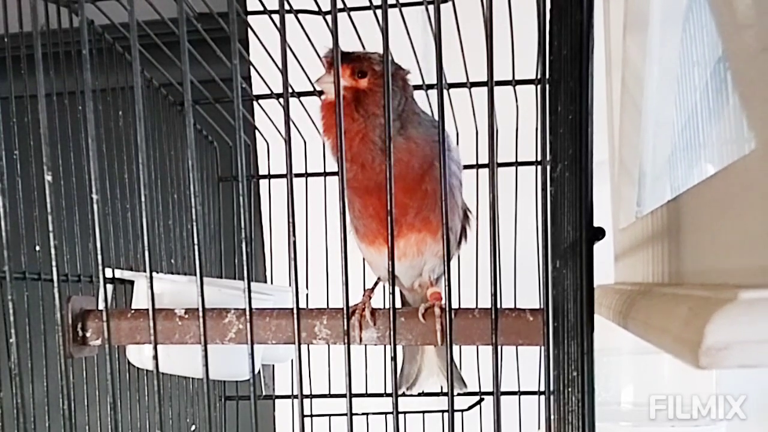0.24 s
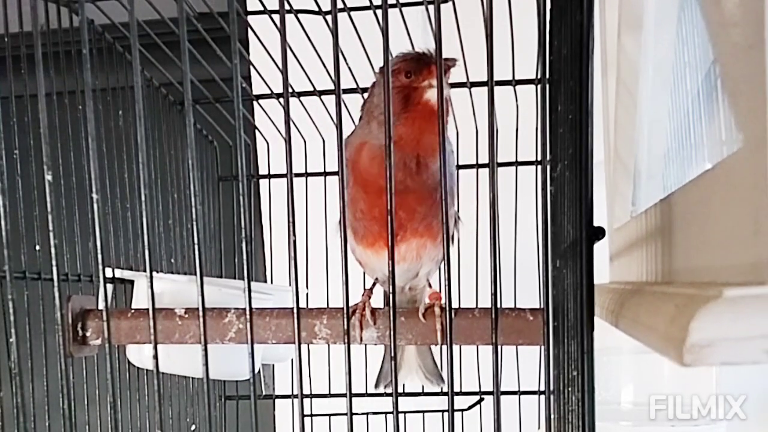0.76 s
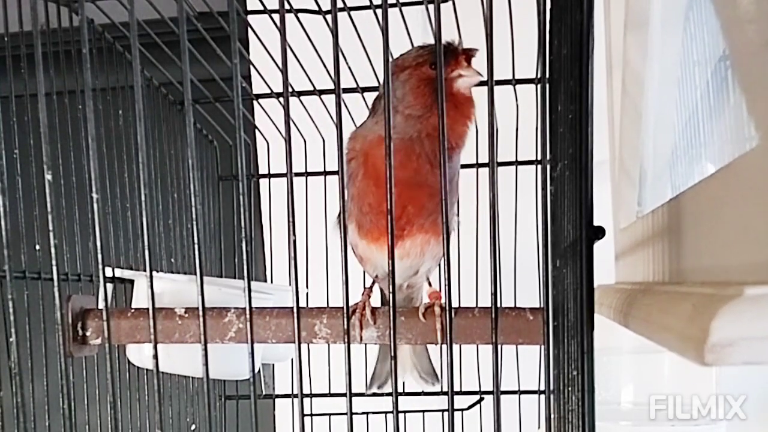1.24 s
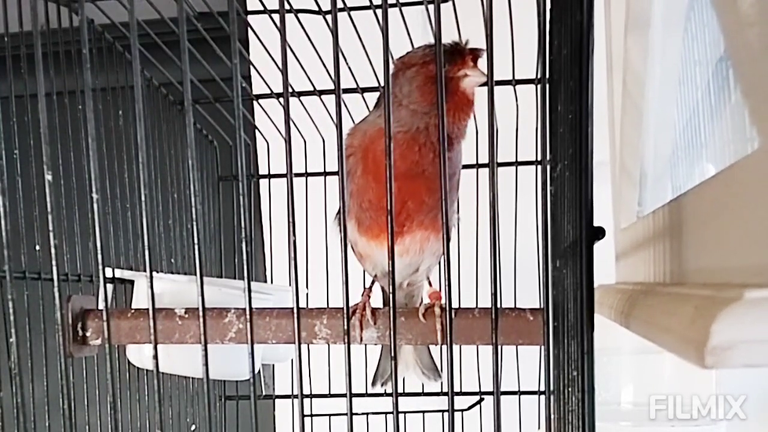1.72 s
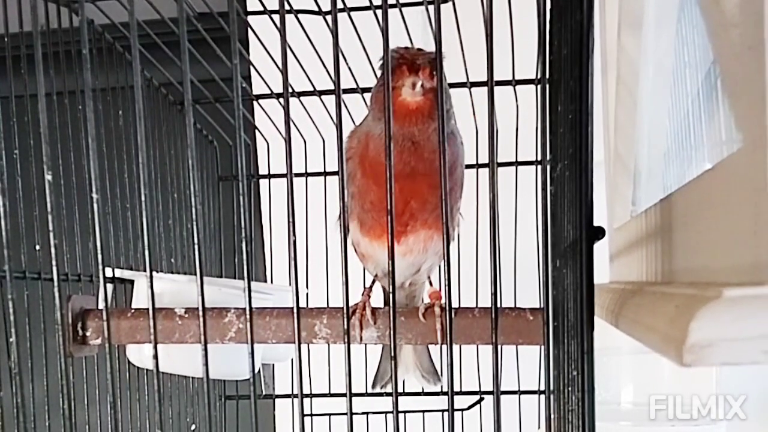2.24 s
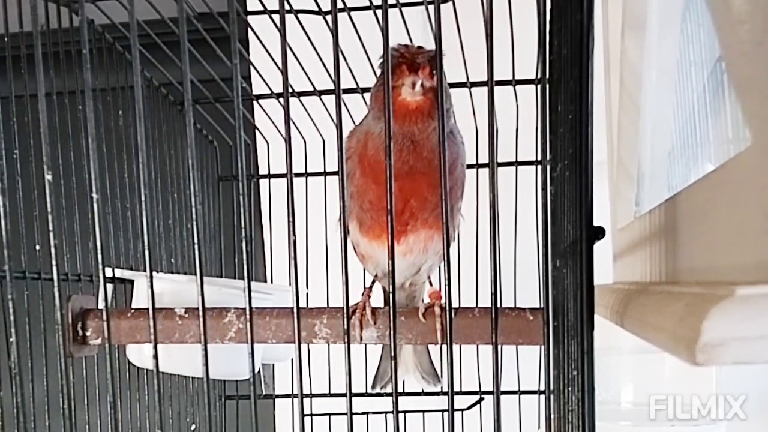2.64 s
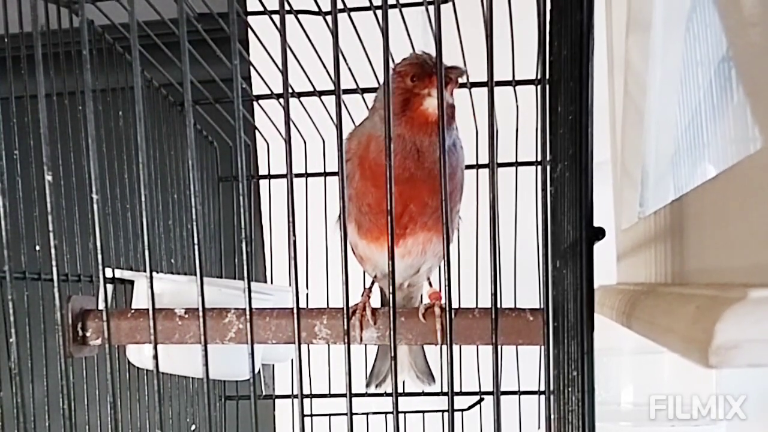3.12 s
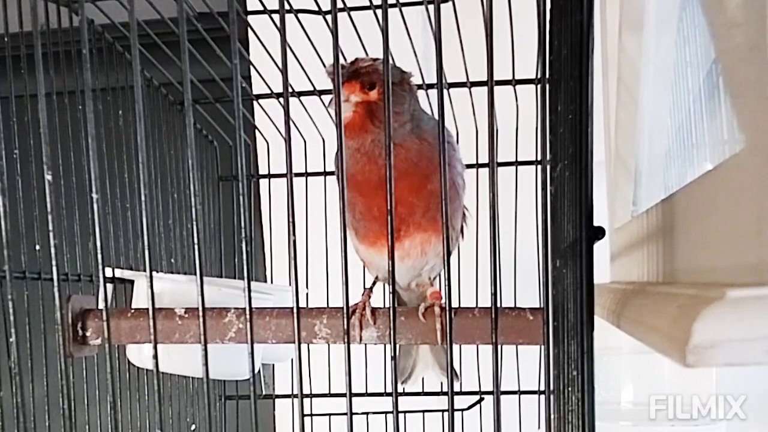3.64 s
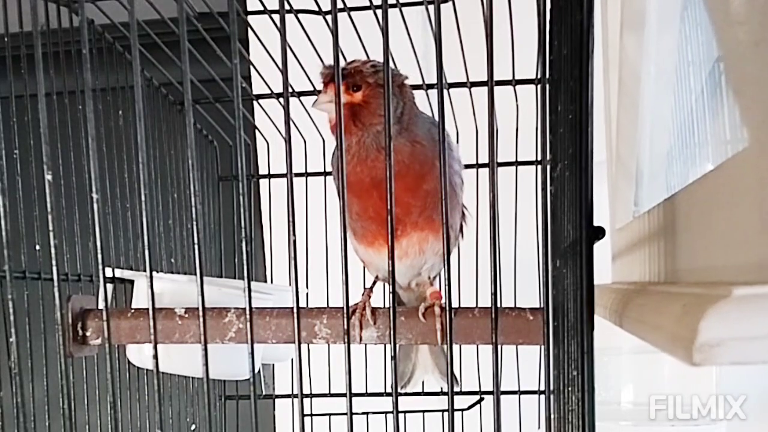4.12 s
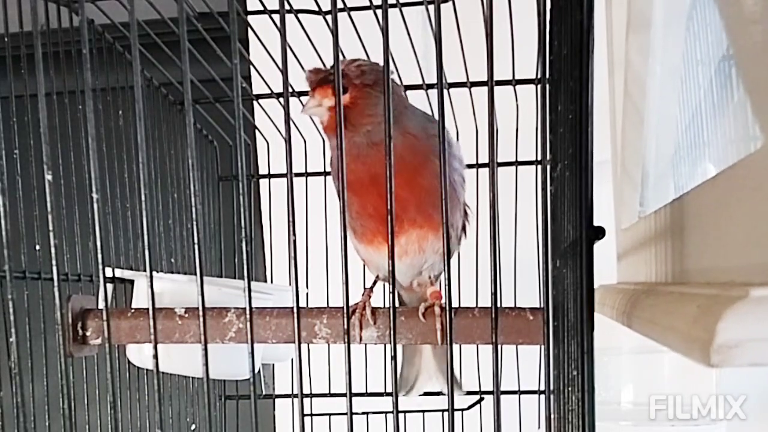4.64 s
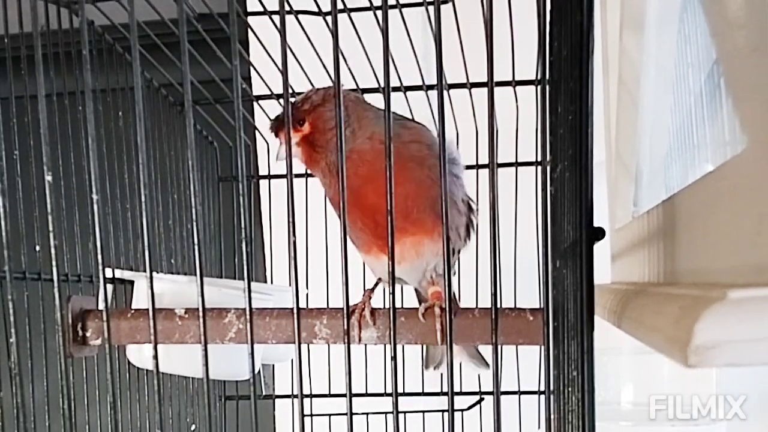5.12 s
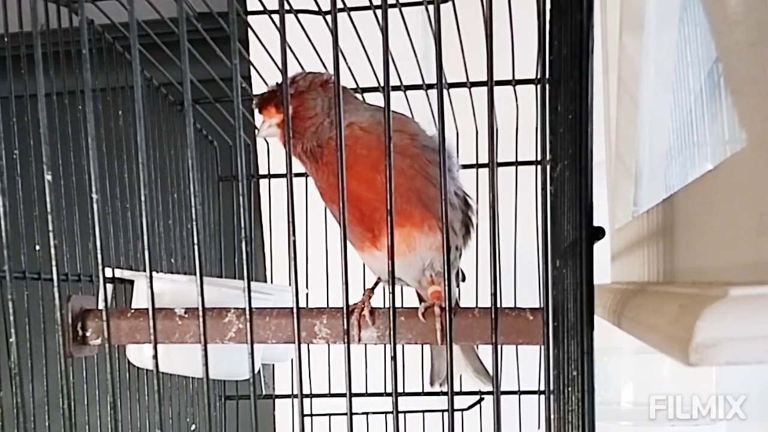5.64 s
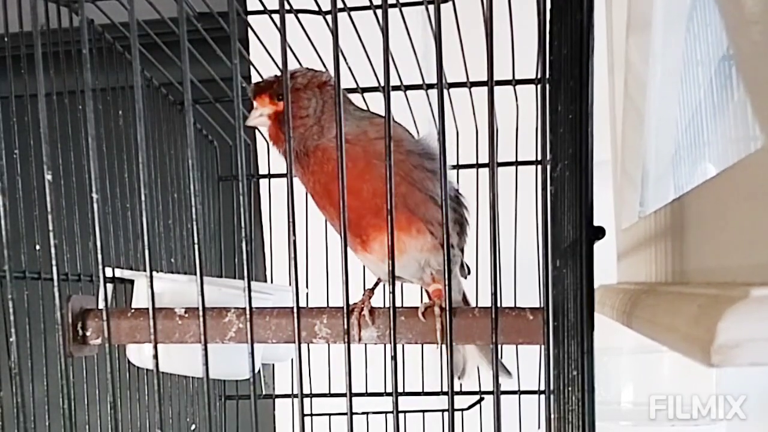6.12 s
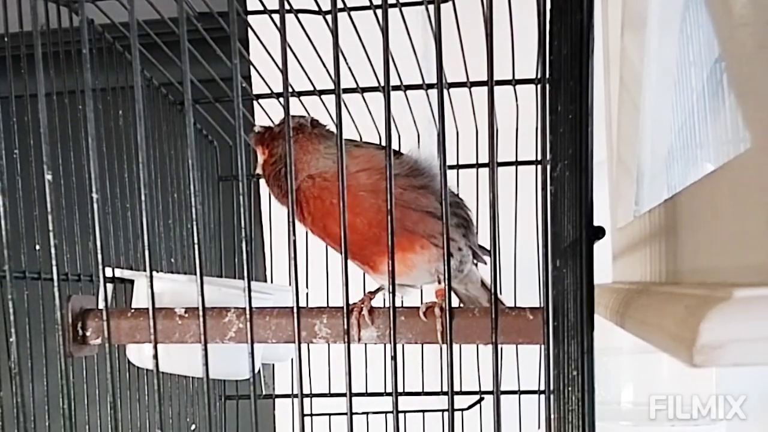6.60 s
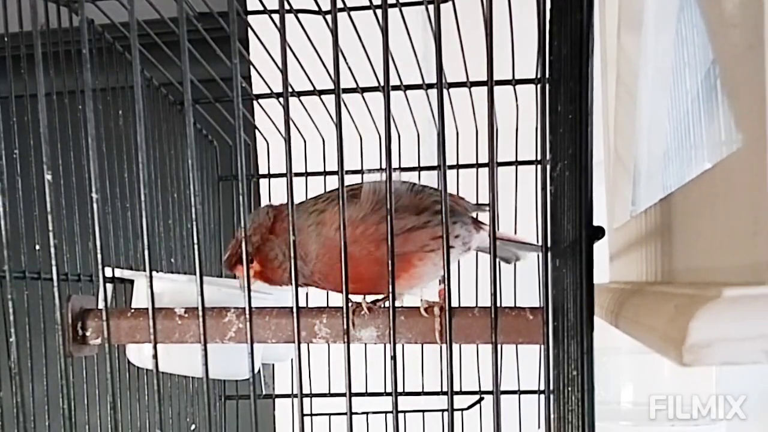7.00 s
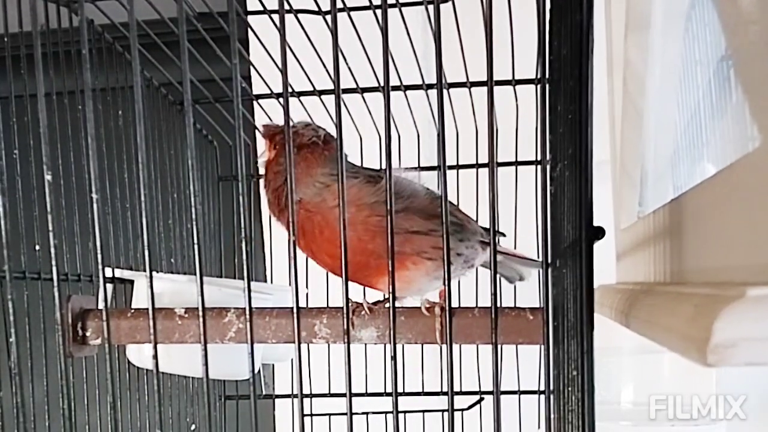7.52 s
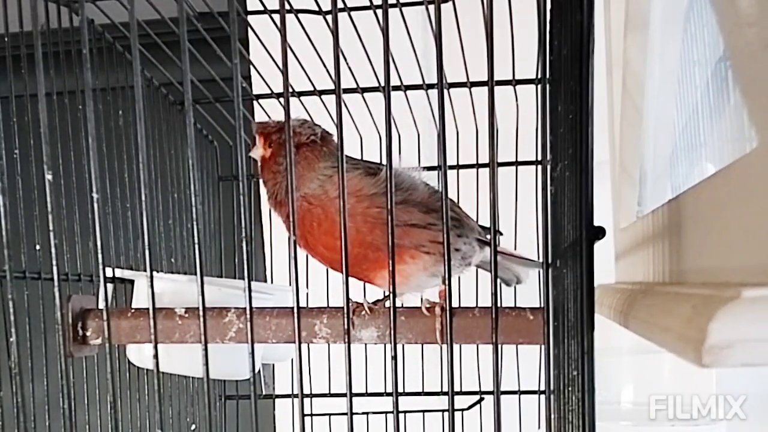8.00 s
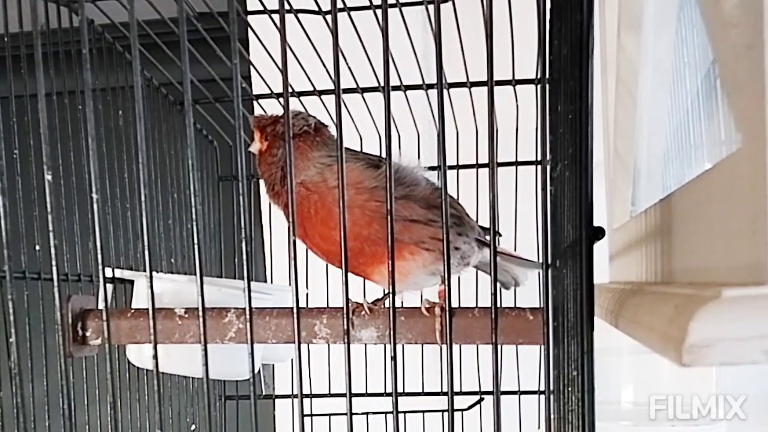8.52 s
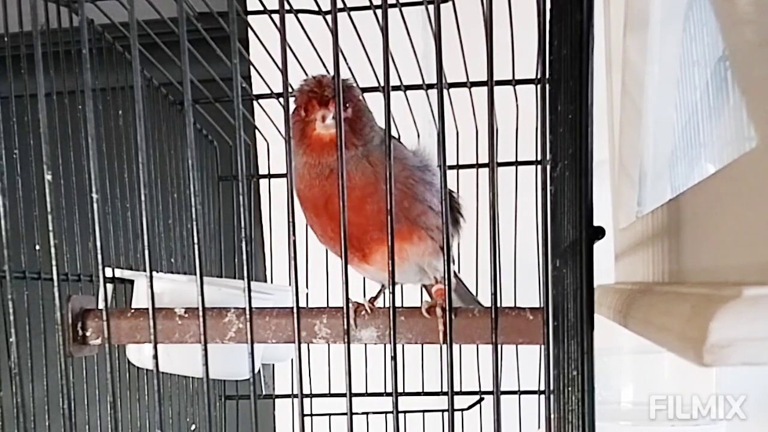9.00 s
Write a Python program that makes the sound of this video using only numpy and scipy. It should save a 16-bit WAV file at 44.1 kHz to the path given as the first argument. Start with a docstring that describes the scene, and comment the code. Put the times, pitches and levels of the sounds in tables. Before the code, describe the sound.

A close canary sings five quick notes, a whistle and a loud falling trill, then distant canaries chirp faintly amid wind rumble and soft cage rattles.

```python
"""A caged canary sings close by in a hard-walled room: pulsed notes, a whistle, then a trill of falling sweeps.
Other canaries chirp, trill and roll further off, as enveloped sine glides washed out by the room.
Late on, the near bird scuffles and rings its cage, noise through resonances, then gives two upward calls.
Gusts of shaped noise rumble on the microphone from the start, thin out past the middle and return at the end."""
import sys
import numpy as np
from scipy import signal
from scipy.fft import rfft, irfft, next_fast_len
from scipy.io import wavfile
from scipy.ndimage import map_coordinates

SR = 44100
rng = np.random.default_rng(int(sys.argv[2]) if len(sys.argv) > 2 else 0)


def materialize(psi):
    """Save the field psi as 16-bit PCM at rate SR to the path in sys.argv[1].

    A 1-D psi becomes a single channel; in a 2-D psi each row is a channel.
    """
    bounded = np.clip(np.atleast_2d(psi).T, -1, 1)
    quanta = np.round(bounded * 32767).astype(np.int16)
    wavfile.write(sys.argv[1], SR, quanta)


N = 408366


def near_canary():
    """Notes and sweeps, heard directly, off the nearest walls and through the room."""
    # echoes off the walls: left delay/s, left level/dB, right delay/s, right level/dB
    walls = [(.00324, -17.5, 0.0047, -11), (.00972, -8, 0.0079, -11), (0.0219, -15.5, .026, -20)]
    notes, trill = near_notes(), near_trill()

    def delayed(hz, s, db):
        return amp(db) * np.exp(-2j * np.pi * hz * s)

    def echoes(hz):
        return sum(np.array([delayed(hz, left_s, left_db), delayed(hz, right_s, right_db)])
                   for left_s, left_db, right_s, right_db in walls)

    def direct(hz):
        # the bird sits to the left, so its sound reaches the right port later and weaker
        return np.array([np.ones_like(hz), delayed(hz, 0.000091, -11.5)])

    def lean(hz):
        # the overtones lean to the right
        right_lean_db = along([(5000, 3.2), (8000, 18.5), (14000, 34.0)], hz)
        return amp(np.outer([-.5, .5], right_lean_db))

    close = filtered(notes + trill, lambda hz: lean(hz) * (direct(hz) + echoes(hz)))
    # the beak beams high notes forward: less of them spills into the room
    spill = filtered(trill + amp(-3) * notes, lambda hz: amp(along([(3200, -10), (4000, -11)], hz)))
    return close + room(spill, t60=0.56, treble_t60=0.6)


def near_notes():
    """The pulsed opening notes and the upward calls, each a syrinx tone on a pitch glide."""
    # opening notes, all gliding up to one pitch: onset t/s, length/s, start f/Hz, level/dB
    pulses = [(.004, 0.046, 2382, -20.5), (0.081, 0.059, 2240, -22), (.167, 0.055, 2358, -21),
              (0.254, 0.052, 2407, -23), (0.349, 0.047, 2426, -21)]
    pulse_to_hz, pulse_rasp = 2495, .15
    pulse_overtone_db, pulse_hiss_db = 1, -22
    # the whistle and the later calls: onset t/s, length/s, start f/Hz, end f/Hz, level/dB,
    # rasp/0-1, overtone boost/dB, hiss/dB
    calls_up = [(0.33, 0.195, 3800, 4025, -23, .06, -9, -42), (7.491, .074, 3330, 3930, -28, .35, -12, -35),
                (8.131, 0.19, 3560, 4015, -29.5, .07, -7, -48)]
    call_bend, call_edge = 4.9, 0.79  # how soon a call reaches its pitch, how gently it swells
    track = np.zeros(N)
    for s, length, start_hz, db in pulses:
        pitch, swell = glide(length, start_hz, pulse_to_hz, bend=2, edge=0.47)
        voice = syrinx(pitch, pulse_rasp, pulse_overtone_db, pulse_hiss_db)
        add(track, s, amp(db) * swell * voice)
    for s, length, start_hz, end_hz, db, rasp, overtone_db, hiss_db in calls_up:
        pitch, swell = glide(length, start_hz, end_hz, call_bend, call_edge)
        voice = syrinx(pitch, rasp, overtone_db, hiss_db)
        add(track, s, amp(db) * swell * voice)
    return track


def near_trill():
    """One falling sweep, repeated; effort sets its level and pitch."""
    # pitch through one sweep: share of its length/0-1, ratio to its top pitch
    fall_pitch = [(0, 1), (.25, .81), (.65, .6), (1, .35)]
    # loudness through one sweep: share of its length/0-1, level/dB
    fall_level = [(0, -10), (0.159, 0), (.36, -8), (.56, -1.5), (.76, -14), (1, -19)]
    # effort through the trill: t/s, level/dB, top of a sweep f/Hz
    effort = [(0.47, -21, 3206), (.56, -18.5, 3505), (.85, -18, 3558), (1.189, -21, 3564),
              (1.391, -23, 3347)]
    first_s, period_s, sweep_s = .471, .0895, .051
    drag_s = .028  # the trill keeps a steady beat, then drags as the bird tires: delay of the last sweep
    track = np.zeros(N)
    times, effort_db, top_hz = np.transpose(effort)
    u = np.linspace(0, 1, int(sweep_s * SR))
    swell = amp(np.interp(u, *np.transpose(fall_level))) * signal.windows.tukey(len(u), .1)
    fall = np.interp(u, *np.transpose(fall_pitch))
    # each sweep starts with a rough catch and strong overtones, then runs more smoothly
    rasp = .13 + .25 * np.exp(-u / .08)
    overtone_db = 13 * np.exp(-u / .13) - 4.5
    for s in beats(first_s, period_s, count=11, drag=drag_s):
        pitch = np.interp(s, times, top_hz) * fall * (1 + 0.03 * wobble(140, len(u)))
        voice = syrinx(pitch, rasp, overtone_db, air_db=-18.5)
        add(track, s, amp(np.interp(s, times, effort_db)) * swell * voice)
    return track


def syrinx(pitch, rasp, overtone_db, air_db):
    """A tone with overtones and a hiss; rasp shakes it and adds a noisy band just above the pitch."""
    # overtones before the boost: multiple of the pitch, level/dB
    overtones = [(2, -21), (3, -28.5), (4, -34.5)]
    size = len(pitch)
    phase = 2 * np.pi * np.cumsum(pitch) / SR + rasp * wobble(1100, size)
    tone = np.sin(phase)
    for k, db in overtones:
        below_nyquist = k * pitch < SR / 2
        tone = tone + amp(db + overtone_db) * np.sin(round(k) * phase) * below_nyquist
    shaken = tone * (1 + rasp * wobble(700, size))
    skirt = rasp * wobble(1300, size) * np.sin(1.17 * phase)
    hiss = amp(air_db) * rng.standard_normal(size)
    return np.sqrt(2) * (shaken + skirt) + hiss


def glide(length, start_hz, end_hz, bend, edge):
    """Pitch and loudness of a syllable: positive bend moves fastest at first, negative bend at last."""
    u = np.linspace(0, 1, int(length * SR))
    pitch = start_hz + (end_hz - start_hz) * np.expm1(-bend * u) / np.expm1(-bend)
    return pitch, np.abs(np.sin(np.pi * u)) ** edge


def beats(first, period, count, drag):
    """Times of a steady beat whose last strokes come up to drag seconds late."""
    drag_power = 6.5  # how late the drag sets in
    return first + period * np.arange(count) + drag * np.linspace(0, 1, count) ** drag_power


def far_canaries():
    """Each phrase repeats one sine syllable, a little different every time, washed out by the room."""
    # trills of falling chirps: first t/s, last t/s, period/s, length/s, start f/Hz, end f/Hz, level/dB
    falling = [(1.699, 2.074, .124, 0.045, 5400, 3320, -56), (2.195, 2.322, .125, .05, 5240, 3404, -53),
               (1.776, 2.401, .125, 0.022, 7360, 6280, -69), (7.735, 8.125, .1, 0.069, 4740, 3260, -60),
               (8.32, 8.626, .1, 0.045, 5210, 3970, -60), (8.731, 8.953, .22, .085, 5020, 2910, -50)]
    # trills of rising chirps: first t/s, last t/s, period/s, start f/Hz, level/dB
    rising = [(2.516, 3.174, .058, 5420, -63), (2.598, 3.242, 0.063, 4350, -65.5),
              (3.231, 3.579, .0865, 5580, -53.5), (4.038, 4.33, .097, 5270, -62)]
    # trills of hooked notes: first t/s, last t/s, period/s, lowest f/Hz, level/dB
    hooked = [(3.313, 3.849, .0894, 4420, -52), (3.939, 4.611, .096, 4290, -51)]
    # rolls of fast falling notes: first t/s, last t/s, top f/Hz, bottom f/Hz, level/dB
    rolls = [(2.099, 2.56, 3700, 3310, -70), (2.599, 3.22, 3676, 3230, -62.5),
             (4.72, 5.16, 3395, 3077, -48.5), (5.2, 5.58, 3213, 2930, -62), (5.62, 6.0, 2840, 2115, -68),
             (6.04, 6.62, 3000, 2140, -64), (8.28, 8.49, 3244, 2980, -56.5), (8.56, 8.68, 3445, 3190, -55)]
    # single whistles: onset t/s, length/s, start f/Hz, end f/Hz, level/dB
    whistles = [(2.464, 0.037, 5070, 4390, -58.5), (4.702, 0.036, 2785, 2770, -48.5),
                (6.674, 0.053, 3040, 4020, -55), (6.912, 0.081, 3940, 4186, -57),
                (7.232, 0.163, 4590, 4655, -58), (7.63, 0.035, 4630, 4680, -56)]
    rise_ratio, rise_s, hook_fall_s = 1.19, .019, .02
    roll_period_s, roll_note_s = .038, 0.024
    # a falling chirp thins where one side of the syrinx hands over to the other
    break_hz, break_width_hz, handover_db = 4000, 380, -11
    waver = .01  # random detuning, as a share of the pitch
    arch_db = 3  # a phrase swells toward its middle
    direct_db, far_t60_s = -10, .37
    song = np.zeros(N)

    def sing(times, length, start_hz, end_hz, db, bend, break_db=0):
        pitch, swell = glide(length, start_hz, end_hz, bend, edge=0.2)
        swell = swell * amp(break_db * np.exp(-((pitch - break_hz) / break_width_hz) ** 2))
        arch = np.sin(np.pi * (np.arange(len(times)) + .5) / len(times)) - 1
        for s, note_db in zip(times, db + arch_db * arch):
            drift = waver * (rng.standard_normal() + wobble(392, len(pitch)))
            tone = np.sin(2 * np.pi * np.cumsum(pitch * (1 + drift)) / SR)
            add(song, s, amp(note_db + rng.standard_normal()) * swell * tone)

    for first, last, period, length, start_hz, end_hz, db in falling:
        sing(repeats(first, last, period), length, start_hz, end_hz, db, bend=0.22, break_db=handover_db)
    for first, last, period, hz, db in rising:
        sing(repeats(first, last, period), rise_s, hz, rise_ratio * hz, db, bend=1)
    # a hooked note flicks up, then falls
    for first, last, period, hz, db in hooked:
        times, top_hz = repeats(first, last, period), rise_ratio * hz
        sing(times, rise_s, hz, top_hz, db, bend=1)
        sing(times + rise_s, hook_fall_s, top_hz, hz, db, bend=-0.92)
    for first, last, top_hz, bottom_hz, db in rolls:
        sing(repeats(first, last, roll_period_s), roll_note_s, top_hz, bottom_hz, db, bend=-0.57)
    for s, length, start_hz, end_hz, db in whistles:
        sing([s], length, start_hz, end_hz, db, bend=1)
    return amp(direct_db) * song + amp(3) * room(song, far_t60_s, far_t60_s)


def repeats(first, last, period):
    """Evenly spaced times from first to last, as near to the period as fits."""
    return np.linspace(first, last, 1 + round(abs(last - first) / period))


def peeps():
    """Tiny steady notes with one overtone, too soft to wake the room."""
    # onset t/s, length/s, pitch f/Hz, level/dB
    peep_notes = [(2.214, 0.054, 1395, -68), (6.096, .036, 2116, -51.5), (8.127, 0.097, 432, -64.5)]
    track = np.zeros(N)
    for s, length, hz, db in peep_notes:
        phase = 2 * np.pi * hz * np.arange(int(length * SR)) / SR
        tone = np.sin(phase) + amp(-16) * np.sin(2 * phase)
        add(track, s, amp(db) * np.hanning(len(phase)) * tone)
    return track


def scuffles():
    """Feathers and claws brush the cage as crackling noise, and its tray rings in resonant bands."""
    # strokes against the cage: onset t/s, rise/s, t60/s, rustle level/dB, ring level/dB before its boost
    strokes = [(3.042, .003, .3, -63.5, -60), (6.84, .014, .5, -55, -49.5), (6.957, .008, .28, -58, -60),
               (7.137, .001, .45, -51.5, -50), (7.203, .006, .35, -54, -56)]
    # resonances of the tray: centre f/Hz, width/Hz, level/dB
    tray_modes = [(573.6, 4, 1), (832, 12.6, -0.5), (1153, 27, -7), (1383, 8.4, -10.5), (1740, 10, -9)]
    # colour of the rustle: f/Hz, relative density/dB per Hz
    rustle_colour = [(120, -44), (190, -11.5), (370, -21), (1200, -12), (2000, -20.5), (4400, -8.5),
                     (7000, -21), (15800, -18.5)]
    t = np.arange(N) / SR
    rustle, ring = np.zeros(N), np.zeros(N)
    for s, rise, t60, rustle_db, ring_db in strokes:
        age = np.maximum(t - s, 0)
        stroke = -np.expm1(-age / rise) * amp(-60 * age / t60)
        rustle += amp(rustle_db) * stroke
        ring += amp(ring_db) * stroke

    def tray(f):
        return sum(amp(db) * 1j * f * w / (c * c - f * f + 1j * f * w) for c, w, db in tray_modes)

    crackle = amp(7.0 + 1.4 * wobble(440, N))
    ringing = unit(filtered(noise([(2000, 22), (4000, -45.0)]), tray))
    return rustle * crackle * noise(rustle_colour) + amp(4.0) * ring * ringing


def tick():
    """A claw ticks on the perch: a short dry burst of noise."""
    # colour of the tick: f/Hz, relative density/dB per Hz
    tick_colour = [(1500, -9), (3200, 7), (4500, 2), (7000, -31), (15000, -33.5)]
    tick_s, t60_s, level_db = 6.16, 0.2, -59.5
    age = np.arange(N) / SR - tick_s
    return (age > 0) * amp(level_db - 60 * np.abs(age) / t60_s) * noise(tick_colour)


def gusts():
    """Eddies rumble on the microphone and rush through the resonances of its ports; stronger air is brighter."""
    # colour of the rumble: f/Hz, relative density/dB per Hz
    rumble_colour = [(25, -23), (60, -18), (120, -13), (220, 1.5), (295, -4), (400, -18.5), (700, -53.5)]
    # colour of the rush, peaked at the port resonances: f/Hz, relative density/dB per Hz
    rush_colour = [(330, -24.5), (410, -24), (475, 6.5), (570, -6), (668, 7.5), (780, -6), (1600, -13),
                   (2400, -14), (4200, -15.5), (7500, -21.5), (15500, -23)]
    # deep buffets of air on the microphone: centre t/s, width/s, level/dB
    buffets = [(.3, 0.11, -50.5), (1.68, 0.14, -49.5), (3.17, 0.056, -51.5), (4.97, 0.17, -45.5)]
    # colour of the buffets: f/Hz, relative density/dB per Hz
    buffet_colour = [(22, -27.5), (45, 7), (70, -12.5), (100, 0), (200, -46.5)]
    strength_db = gust_strength()
    flow = amp(strength_db + 1.3 * wobble(35, N) + wobble(180, N))
    rumble = amp(-5.5 + 1.5 * wobble(45, N)) * noise(rumble_colour)
    rush = amp(-8.5 + 0.17 * (strength_db + 37.5)) * noise(rush_colour)
    return flow * (rumble + rush) + swells(buffets, buffet_colour)


def gust_strength():
    """Each gust swells, holds, then dies away at a shared rate; overlapping gusts add in power (dB)."""
    # full strength at t/s, rise/s, hold/s, strength/dB
    gust_list = [(0, .04, 0.11, -39.5), (0.183, .06, 0.13, -36.5), (0.485, 0.082, 0.39, -44),
                 (1.285, .08, 0.077, -43.5), (1.448, 0.088, 0.25, -36), (1.869, 0.065, 0.048, -47),
                 (3.061, .015, .01, -51), (3.121, 0.057, 0.11, -50), (3.405, 0.11, 0.17, -41),
                 (3.668, 0.044, 0.011, -35), (3.801, 0.063, 0.09, -42.5), (4.014, .04, 0.018, -47.5),
                 (4.145, 0.082, .01, -52.5), (4.406, 0.096, .008, -43.5), (4.54, 0.08, 0.065, -39.5),
                 (4.817, .014, 0.06, -34.5), (5.038, 0.11, 0.043, -34.5), (5.38, .1, 0.064, -53),
                 (8.507, 0.043, 0.029, -55.5), (9.033, 0.0445, 0.13, -53), (9.246, 0.092, .03, -41)]
    release_db_per_s = 66.5
    t = np.arange(N) / SR
    power = np.full(N, 1e-12)
    for s, rise, hold, db in gust_list:
        onset = np.exp(-2 * (np.minimum(t - s, 0) / rise) ** 2)
        release = amp(db - release_db_per_s * np.maximum(t - s - hold, 0))
        power += (onset * release) ** 2
    return 10 * np.log10(power)


def swells(table, spectrum):
    """Low noise that comes and goes in smooth humps."""
    t = np.arange(N) / SR
    level = sum(amp(db) * np.exp(-((t - s) / width) ** 2) for s, width, db in table)
    return level * noise(spectrum)


def room(x, t60, treble_t60):
    """A diffuse stereo tail of about unit energy a side, with a decay time of its own for the treble."""
    hz, t, z = signal.stft(rng.standard_normal((2, SR)), SR, nperseg=256)
    life = along([(3000, t60), (12000, treble_t60)], hz)[:, None]
    build_up = 1 - np.exp(-t / 0.0091)
    tail = signal.istft(z * amp(-60 * t / life) * build_up, SR, nperseg=256)[1]
    return signal.fftconvolve(x[None], tail / np.linalg.norm(tail[0]), axes=1)[:, :N]


def noise(spectrum):
    """Stereo noise of rms 1, more alike in the bass than in the treble."""
    # likeness of the two sides: f/Hz, correlation/0-1
    alike = [(200, 0.85), (700, 0.54), (2500, 0.39), (10000, 0.2)]

    def mid_side(hz):
        turn = np.arccos(np.clip(along(alike, hz), -1, 1)) / 2
        return amp(along(spectrum, hz)) * [np.cos(turn), np.sin(turn)]

    mid, side = filtered(rng.standard_normal((2, N)), mid_side)
    return unit(np.array([mid + side, mid - side]))


def amp(db):
    """Decibels to gain."""
    return 10 ** (np.asarray(db) / 20)


def unit(x):
    """Scaled to rms 1."""
    return x / np.sqrt(np.mean(x ** 2) + 1e-20)


def along(points, hz):
    """(Hz, value) points read on a log axis."""
    f, v = np.transpose(points)
    return np.interp(np.log(hz + 1), np.log(f + 1), v)


def wobble(rate, size):
    """A smooth random curve, rate knots a second."""
    knots = rng.standard_normal(int(size * rate / SR) + 4)
    return map_coordinates(knots, [np.arange(size) * rate / SR])


def filtered(x, response):
    """x times a response of frequency."""
    m = next_fast_len(N + SR // 2)
    return irfft(rfft(x, m) * response(np.fft.rfftfreq(m, 1 / SR)), m)[..., :N]


def add(track, s, sound):
    """Mix a sound into a track at time s."""
    part = track[max(0, round(s * SR)):][:len(sound)]
    part += sound[:len(part)]


def scene():
    """Birds, cage and moving air over the quiet of the room."""
    # soft low bumps: centre t/s, width/s, level/dB
    bumps = [(.53, 0.049, -35.5), (6.09, 0.096, -53.5), (6.27, 0.111, -50.5), (7.86, 0.061, -60.5)]
    # colour of the bumps: f/Hz, relative density/dB per Hz
    bump_colour = [(130, -29.5), (200, -3), (250, -2), (350, -28.5), (2000, -47)]
    # colour of the quiet room: f/Hz, relative density/dB per Hz
    floor_colour = [(25, -5.5), (230, -4), (560, -15.5), (2500, -28), (15800, -21)]
    birds = near_canary() + far_canaries() + peeps()
    cage = scuffles() + tick()
    low = (swells(bumps, bump_colour) + gusts()) * amp([[-.8], [.8]])  # a little louder on the right
    return birds + cage + low + amp(-73.5) * noise(floor_colour)


def record(dry):
    """The microphone has a dip in the treble; nothing above the band limit is kept."""
    top_hz = 15850
    colour = [(3500, 2.0), (5000, 1.5), (7000, -4.0), (8600, -13), (10000, -5.5)]  # f/Hz, gain/dB
    return filtered(dry, lambda hz: amp(along(colour, hz)) * (hz < top_hz))


dry = scene()
out = record(dry)
materialize(out)
```